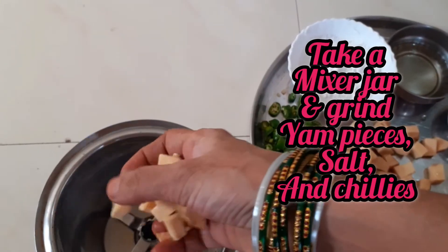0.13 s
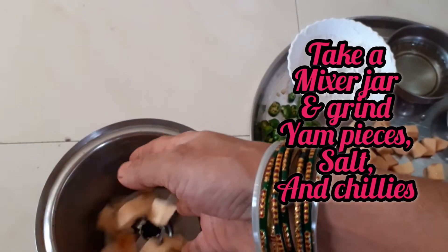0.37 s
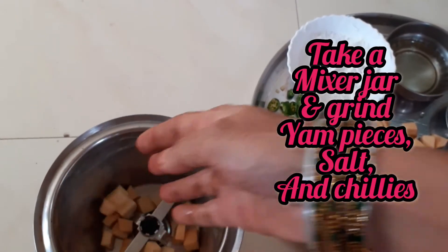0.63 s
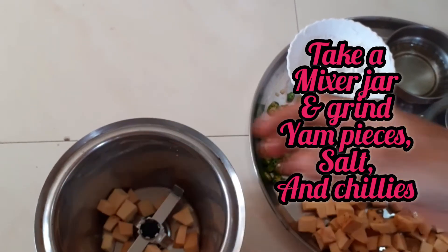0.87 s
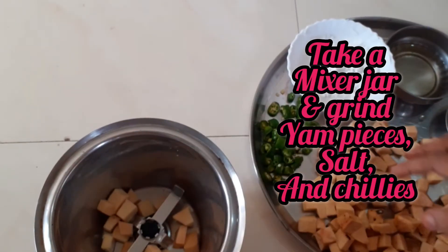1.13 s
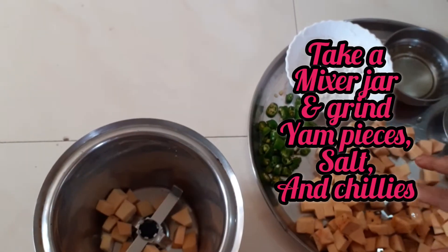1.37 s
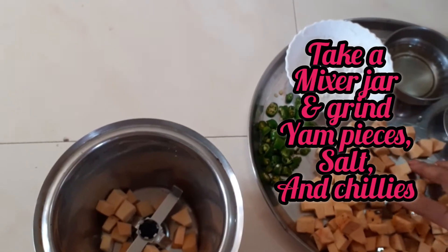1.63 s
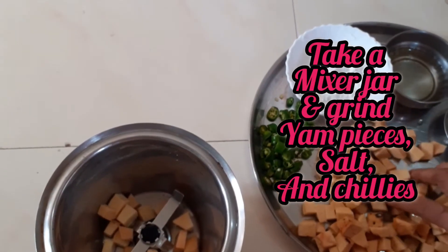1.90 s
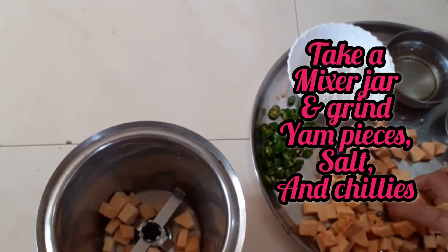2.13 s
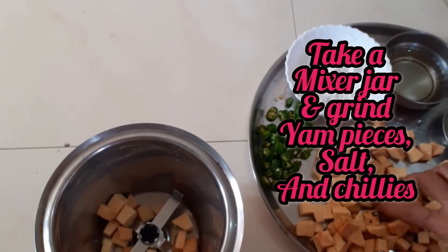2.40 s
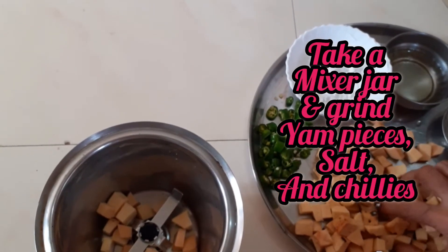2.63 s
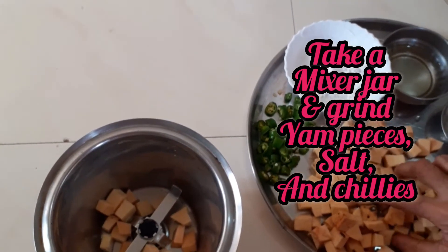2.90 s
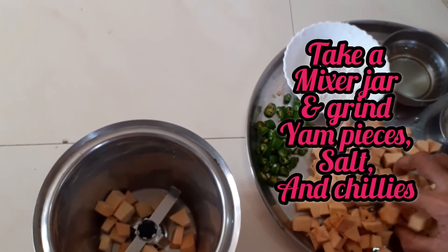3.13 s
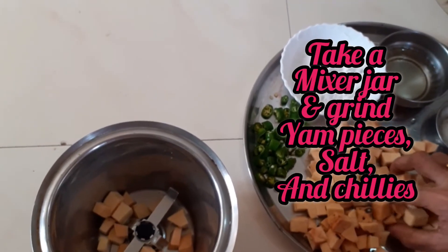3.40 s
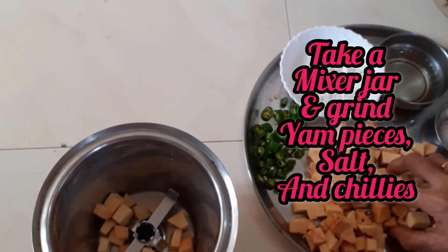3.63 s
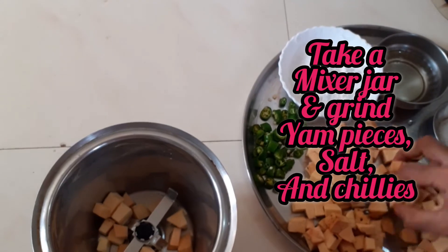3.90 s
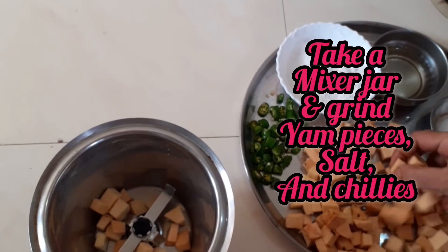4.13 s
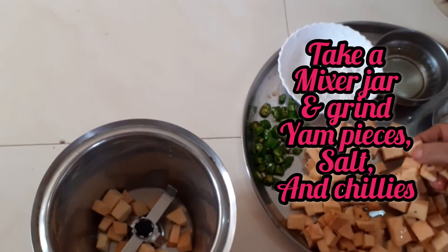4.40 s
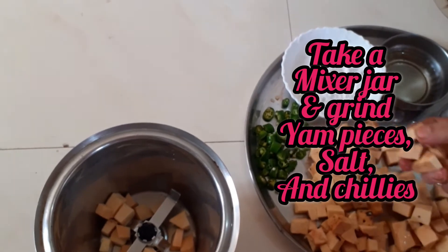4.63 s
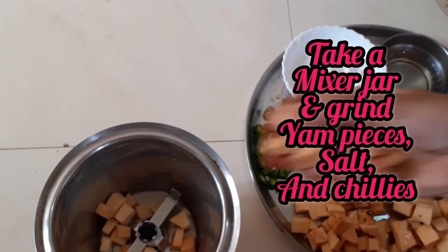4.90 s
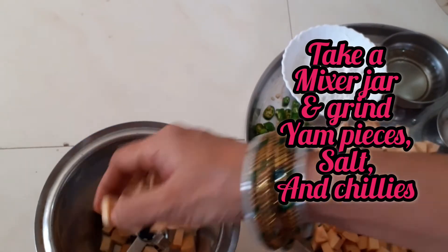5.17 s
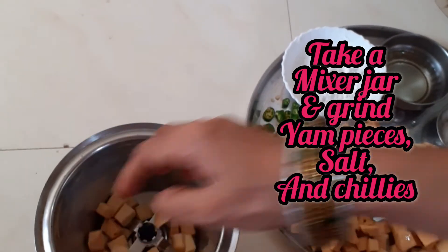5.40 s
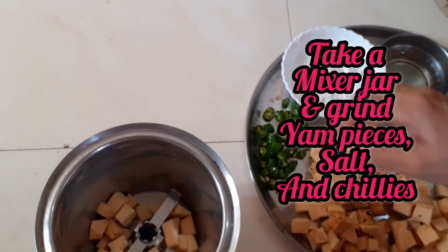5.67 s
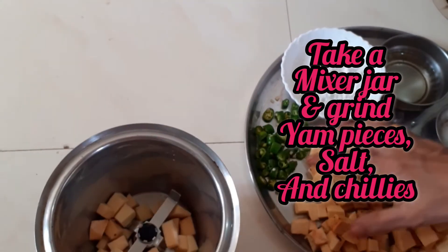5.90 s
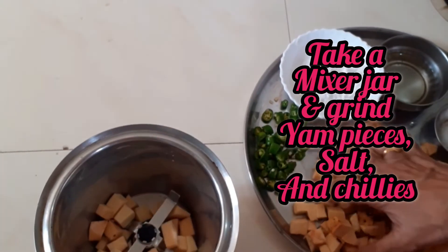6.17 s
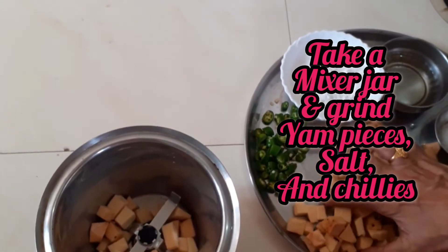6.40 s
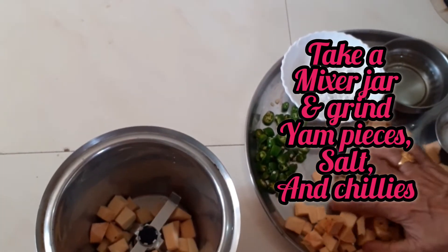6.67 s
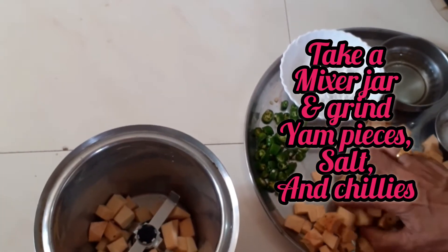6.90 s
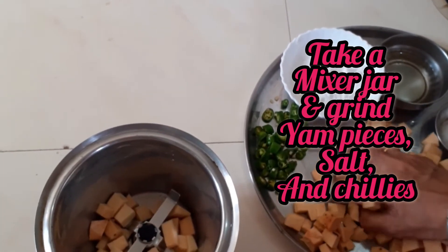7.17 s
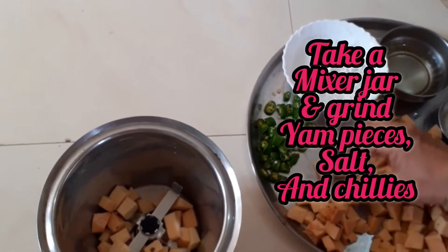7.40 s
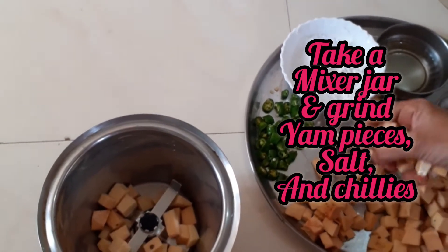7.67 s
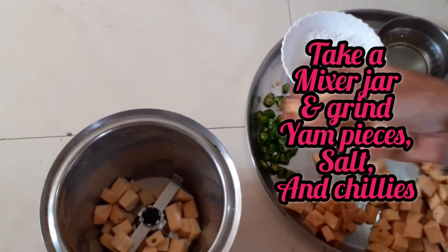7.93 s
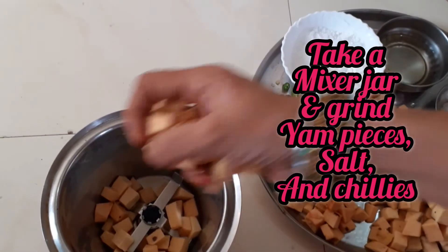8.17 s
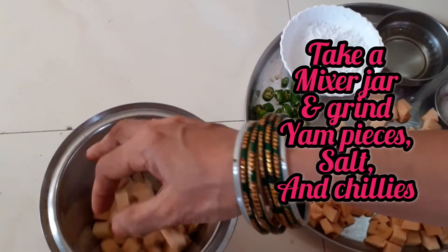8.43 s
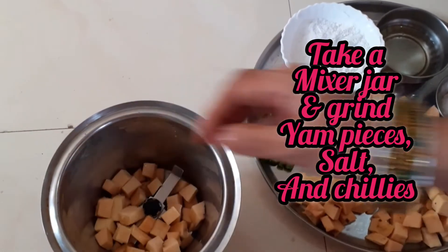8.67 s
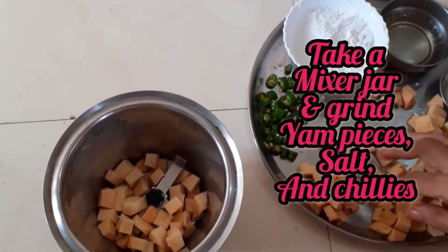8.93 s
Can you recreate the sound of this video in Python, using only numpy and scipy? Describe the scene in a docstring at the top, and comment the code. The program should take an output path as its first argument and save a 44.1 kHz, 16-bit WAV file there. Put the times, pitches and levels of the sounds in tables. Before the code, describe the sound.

Three handfuls of raw vegetable cubes clatter into a hollow steel jar, with ringing metal, soft finger rustling on a plate and bangles clinking between.

```python
"""A small hard kitchen, close stereo microphone: three handfuls of raw yam cubes drop into a steel jar.
The jar's air booms, its steel rings and a blade pings: decaying sines; cracks and knocks are filtered noise.
Between handfuls fingers gather wet cubes from a steel plate: noise scrapes, snaps and dull damped knocks.
Glass bangles clink in brief high modes with a noise scratch. The room answers with sparse decaying
echoes, and a low hum of shaped noise with motor tones lies under everything."""
import sys
import numpy as np
from scipy import signal
from scipy.io import wavfile
from scipy.ndimage import uniform_filter1d

SR = 44100
rng = np.random.default_rng(int(sys.argv[2]) if len(sys.argv) > 2 else 0)


def to_wav(sig):
    """Store sig (one row per channel, or 1-D mono) as 16-bit WAV at the path in sys.argv[1].

    Samples outside -1..1 are clipped; the rate is SR.
    """
    pcm = np.clip(np.atleast_2d(sig), -1, 1) * 32767
    pcm = np.round(pcm).astype(np.int16)
    wavfile.write(sys.argv[1], SR, pcm.T)  # frames by channels


def boost(x):
    """Linear amplitude factor 10**(x/20) for a level x in decibels (scalar or array-like)."""
    u = np.asarray(x, float) / 20
    return 10 ** u


N = 399105  # length in samples

# All levels below are relative, before the balance set in the functions.
# Spectrum of the room hum. Each row: frequency in Hz, density in dB per Hz.
HUM_SPECTRUM = [(15, -53), (25, -26.5), (102, -4.5), (195, -9), (270, -12), (309, -6.5), (607, -21),
                (659, -23), (1610, -33), (2110, -32), (16000, -41)]
# Left-right likeness of the hum. Each row: frequency in Hz, likeness from 0 to 1.
HUM_LIKENESS = [(60, 1), (300, 0.83), (1000, 0.12), (8000, 0.14)]
# Fuzzy motor tones in the hum. Each row: frequency in Hz, lift over the hum in dB.
MOTOR_TONES = [(100, 4), (152, -0.5), (203, 6), (305, 2.5), (405, 1.5)]
# Echo decay of the kitchen. Each row: frequency in Hz, t60 in seconds.
ROOM_DECAY = [(300, 0.74), (1000, 0.4), (3000, 0.52), (8000, 0.44), (15000, 0.4)]
# Fingers scraping among the cubes. Each row: start in seconds, length in seconds, level in dB.
SCRAPE_STROKES = [(1.536, 0.9, -75), (2.204, 0.37, -76.5), (2.599, 0.11, -67.5), (2.899, 0.21, -67),
                  (3.376, 0.32, -71), (3.752, 0.12, -74), (5.971, 0.045, -70.5), (6.123, 0.174, -74),
                  (6.377, 0.31, -68), (6.77, 0.07, -61), (7.044, 0.098, -62.5), (7.262, 0.038, -66.5)]
# Cubes tumbling dully over each other. Each row: start in seconds, level in dB, pitch in Hz.
CUBE_TUMBLES = [(2.091, -50.5, 393), (2.212, -53.5, 900), (2.303, -55, 2000), (2.315, -59, 2000),
                (2.316, -50, 440), (3.386, -52.5, 714), (3.872, -54.5, 770), (3.886, -58, 1020),
                (3.899, -49.5, 620), (3.949, -48, 1206), (3.961, -49, 1130), (3.988, -52, 880),
                (4.036, -45, 696), (4.129, -49, 697), (4.147, -45, 647), (4.165, -49.5, 1222),
                (4.177, -56, 895), (4.202, -51.5, 1107), (6.484, -52.5, 1266), (6.867, -51, 622),
                (7.1, -49, 486), (7.168, -52.5, 444), (7.233, -57, 622)]
# Wet cubes parting and tapping on the plate.
# Each row: time in seconds, treble level in dB, mid level in dB over the treble.
PLATE_TICKS = [(1.728, -57.5, -25), (1.875, -52, -14.5), (2.1565, -28.5, -7.5), (2.607, -47.5, -7.5),
               (2.6393, -41, -21.5), (2.658, -36.5, -16), (3.019, -47.5, -33), (3.26, -60, -4.5),
               (3.5684, -48, -23), (3.779, -48.5, -25), (3.9421, -42, -13), (4.0361, -31.5, -6),
               (4.2106, -42, -9.5), (5.156, -45.5, -10), (5.9382, -47.5, -15), (5.9831, -41.5, -17),
               (6.0141, -31.5, -12.5), (6.0319, -29.5, -46), (6.3, -49.5, -8), (6.41, -50.5, -11),
               (6.4832, -47, -4), (6.549, -30.5, -11.5), (6.8455, -41, -27), (7.022, -49.5, -28),
               (7.093, -36.5, -29), (7.2871, -48, -20), (7.396, -51.5, -21.5)]
# Bangles touching. Each row: start in seconds, level in dB.
BANGLE_CLINKS = [(1.2725, -53.5), (4.5191, -48), (4.5456, -37.5), (4.5824, -49.5), (4.6344, -36),
                 (4.6404, -40), (4.6564, -40.5), (4.6713, -35.5), (4.7032, -42), (4.7586, -29),
                 (4.7654, -36.5), (5.407, -36.5), (5.5004, -43), (5.5533, -44.5), (5.6017, -47),
                 (5.7977, -49), (7.5994, -45.5), (7.7797, -52.5), (8.1983, -42), (8.2107, -40),
                 (8.921, -53), (8.934, -45.5), (8.9491, -33), (9.023, -53.5)]
# Modes of the glass hoops. Each row: frequency in Hz, level in dB, t60 in seconds.
GLASS_MODES = [(5020, -11, .05), (5600, -13, .04), (8800, -5, .04), (9400, -2, .045), (9900, -3, .03),
               (10800, -1, .03), (12300, -3, .02), (14150, -5, .03), (14800, -2, .03)]
# Cubes striking the blade. Each row: start in seconds, level in dB.
BLADE_HITS = [(0.267, -58), (0.3598, -41), (0.396, -38), (5.312, -47.5), (8.379, -49.5), (8.428, -44.5),
              (8.511, -54.5)]
# Modes of the blade. Each row: frequency in Hz, level in dB, t60 in seconds.
BLADE_MODES = [(4840, 0, .1), (7390, -6, .25), (7540, -2, .12)]
# Main modes of the jar's steel.
# Each row: frequency in Hz, level in dB, t60 in seconds, lead of the left channel in radians.
STEEL_MODES = [(1107, 4, .52, 3.1), (1582, -21, 2.4, 1.5), (1700, -16, .7, 1.5), (1826, -21, 1.5, 1.5),
               (1910, -19, 1.4, 1.5), (2213, -17, 1.4, .9), (2334, -6, 1.1, .9), (2386, -1, .45, .9)]
# Dense high modes of the steel. Each row: frequency in Hz, level in dB, t60 in seconds.
STEEL_HIGH_MODES = [(3015, -11, .9), (3472, -5, 1.1), (3668, -4, 1.0), (4054, -5, .9), (4204, -2, .75),
                    (4576, -4.5, 1.1), (5040, -4, .7), (5103, -4, .7), (5259, -6, .8), (5324, -4, .75),
                    (5561, -6, .8), (5728, -2, .75), (6029, -3, .65), (6185, -4, .8), (6748, -4, .75),
                    (6926, -3, .55), (7079, -4, .3), (7951, -7, .45), (8522, -5, .48), (8845, -8, .44)]
# Cubes lying in the jar damp the steel, and each handful lands elsewhere.
# Each row: time of the handful in seconds, extra decay added to 1 / t60 in 1/s,
# then the levels in dB of the base mode, low wall modes, rim modes and high modes.
JAR_FILL = [(0.399, 0.022, -4, -5, -3, -21.5), (5.401, 0.078, 8, 7.5, 5.5, -21),
            (8.499, 1.3, 12, -4, 3, -14)]
# Cubes landing in the jar.
# Each row: start in seconds, thud level in dB, blow on the steel wall in dB over the thud.
CUBE_DROPS = [(0.243, -26.5, -50.5), (0.27, -40, -16), (0.307, -29, -33.5), (0.315, -24, -46.5),
              (0.322, -21.5, -44), (0.349, -20, -32.5), (0.36, -23.5, -1.5), (0.369, -22.5, -32.5),
              (0.378, -21.5, -16), (0.385, -31, -6.5), (0.397, -25.5, 6.5), (0.406, -29, -1.5),
              (0.416, -28.5, -32.5), (0.424, -27.5, -15.5), (0.452, -26.5, -14), (0.505, -40.5, 0.5),
              (0.593, -38, -27), (0.725, -48, -39.5), (5.269, -41.5, -34), (5.28, -33.5, -24.5),
              (5.288, -26, -18.5), (5.314, -27.5, -13.5), (5.322, -27, -23.5), (5.33, -31.5, 4.5),
              (5.344, -29.5, -10), (5.364, -47.5, -39), (5.384, -39, -2.5), (5.409, -39.5, -6),
              (5.498, -35.5, -59.5), (8.333, -34, -26.5), (8.349, -35, -31.5), (8.362, -34.5, -21.5),
              (8.372, -31, -10.5), (8.38, -26.5, -24), (8.408, -29.5, -19.5), (8.416, -30, -19),
              (8.424, -26, -13), (8.432, -20.5, -26), (8.448, -38.5, 5), (8.456, -32, -15.5),
              (8.464, -29.5, -24), (8.479, -42, -21), (8.513, -42, -2), (8.61, -50, -6)]


def evened(x):
    """Scales to rms 1."""
    return x / np.sqrt(np.mean(x ** 2) + 1e-20)


def read(points, hz):
    """Reads a table on a log-frequency axis."""
    f, value = np.transpose(points)
    return np.interp(np.log(hz + 1), np.log(f + 1), value)


def add(mix, s, sound):
    """Mixes a sound in at s seconds."""
    part = mix[..., round(s * SR):][..., :sound.shape[-1]]
    part += sound[..., :part.shape[-1]]


def band(x, lo_hz, hi_hz):
    """Causal band-pass."""
    return signal.sosfilt(signal.butter(2, [lo_hz, hi_hz], "band", fs=SR, output="sos"), x)


def swell(size, rise_s, power=1):
    """Envelope of a blow: rises to 1 at rise_s, then dies; a higher power narrows the peak."""
    u = np.arange(size) / SR / rise_s
    return (u * np.exp(1 - u)) ** power


def placed(x, pan_db, lag):
    """Stereo position: left louder by pan_db, and late by lag samples."""
    return np.array([np.roll(x, lag) * boost(pan_db / 2), x * boost(-pan_db / 2)])


def hum():
    """Low room rumble with wavering motor tones over faint hiss, in slowly drifting patches."""
    frames, hz = N // 1024 + 5, np.fft.rfftfreq(4096, 1 / SR)
    a, b, c, d, patches = rng.standard_normal((frames, 2049, 5)).T
    patches = evened(uniform_filter1d(uniform_filter1d(patches, 12, 0), 6, 1))
    tones_db = sum(db * np.exp(-((hz - f) / 9) ** 2) for f, db in MOTOR_TONES)
    likeness = read(HUM_LIKENESS, hz)[:, None]
    left = a + 1j * b
    right = likeness * left + np.sqrt(1 - likeness ** 2) * (c + 1j * d)
    spectrum_db = (read(HUM_SPECTRUM, hz) + tones_db)[:, None] + 2.4 * patches
    z = np.array([left, right]) * boost(spectrum_db)
    rumble = signal.istft(z, nperseg=4096, noverlap=3072)[1][:, :N]
    return boost([[-63.0], [-59.2]]) * evened(rumble)


def kitchen(x):
    """Sparse echoes of random sign, each band dying at its own speed; three tails take turns."""
    taps = np.zeros((6, SR // 2 + SR // 4))  # three stereo tails
    at = np.arange(300, taps.shape[1] - 20, 20)  # one echo in every 20 samples
    at = at + rng.integers(0, 20, (6, len(at)))
    np.put_along_axis(taps, at, rng.choice([-1., 1.], at.shape), 1)
    hz, t, z = signal.stft(taps, SR, nperseg=256)
    decay_db = -60 * t / read(ROOM_DECAY, hz)[:, None]
    tails = signal.istft(z * boost(decay_db), SR, nperseg=256)[1]
    tails = tails / np.linalg.norm(tails[0])
    turn = 2 * np.pi * 7 * np.arange(N) / SR  # 7 rounds a second
    turn = turn + 2 * np.pi / 3 * np.arange(3)[:, None]
    fed = np.repeat(x * np.sqrt((1 + np.cos(turn)) / 3), 2, 0)
    wet = signal.fftconvolve(fed, tails, axes=1)[:, :N].reshape(3, 2, N).sum(0)
    return (wet + 0.039 * wet[::-1]) * boost([[-1.8], [1.8]])


def rustle():
    """Wet scraping: each stroke sprays tiny crackles that come in clumps, then fades."""
    rise_s, fade_db_per_s, crackles_per_s = .03, 116.5, 1200
    t, strokes = np.arange(N) / SR, np.zeros(N)
    for s, length, db in SCRAPE_STROKES:
        fade_db = fade_db_per_s * np.maximum(t - s - length, 0)
        strokes += np.clip((t - s) / rise_s, 0, 1) * boost(db - fade_db)
    clumps_db = 4.5 * evened(uniform_filter1d(rng.standard_normal(N), 500))
    size = boost(3.5 * np.minimum(rng.exponential(1, N), 5))
    crackles = size * (rng.random(N) < crackles_per_s / SR) * rng.standard_normal(N)
    wet = evened(band(crackles, 3200, 18000) + 0.49 * band(crackles, 1700, 3500))
    return strokes * boost(clumps_db) * wet


def tumbles():
    """Dull dry knocks of flesh on flesh: a few damped cycles in a wide puff of noise."""
    out, t = np.zeros(N), np.arange(2000) / SR
    noises = rng.standard_normal((len(CUBE_TUMBLES), 2000))
    for (s, db, hz), noise in zip(CUBE_TUMBLES, noises):
        knock = 1.2 * np.sin(2 * np.pi * hz * t) + 3 * band(noise, .7 * hz, 1.6 * hz)
        add(out, s, boost(db) * swell(size=2000, rise_s=.0018) * knock)
    return out


def ticks():
    """Snaps of noise with their own share of treble and mid; the room is fed one sample of equal energy."""
    treble, mid = np.zeros((2, 2, N))
    noises = rng.standard_normal((len(PLATE_TICKS), 2000))
    for (s, db, mid_db), noise in zip(PLATE_TICKS, noises):
        puff = swell(size=2000, rise_s=.002, power=2) * noise
        click = np.linalg.norm(puff) * (np.arange(2000) == 60)
        snap = np.array([puff, click])
        add(treble, s - .0012, boost(db - 6) * snap)
        add(mid, s - .0012, boost(db + mid_db + 6.5) * snap)
    return band(treble, 2900, 19000) + band(mid, 1100, 3300)


def bangles():
    """Thin glass hoops damped by the wrist: brief high modes (chime) and a noisy tick (scratch)."""
    (chime, scratch), t = np.zeros((2, N)), np.arange(3000) / SR
    hz, db, t60 = np.transpose(GLASS_MODES)[:, :, None]
    draws = rng.standard_normal((len(BANGLE_CLINKS), 2, len(GLASS_MODES), 1))
    for (s, level_db), (hoop, spot) in zip(BANGLE_CLINKS, draws):
        mode_hz = hz * (1 + .018 * hoop)
        modes = boost(db + 5 * spot - 60 * t / t60) * np.sin(2 * np.pi * mode_hz * t)
        add(chime, s, boost(level_db - 10.5) * modes.sum(0) * np.minimum(t / 0.00031, 1))
        tick = swell(size=3000, rise_s=0.0026) * rng.standard_normal(3000)
        add(scratch, s, boost(level_db - 11.0) * tick)
    # the scratch takes the colour of the glass
    hoops = (boost(db / 3 - 60 * t / 0.002) * np.sin(2 * np.pi * hz * t)).sum(0)
    scratch = signal.oaconvolve(scratch, hoops / np.linalg.norm(hoops))[:N]
    return chime, band(band(scratch, 4400, 19000), 4600, 18000)


def pings():
    """The thick blade answers a direct hit with a few short bright tones."""
    out, t = np.zeros(N), np.arange(8000) / SR
    hz, db, t60 = np.transpose(BLADE_MODES)[:, :, None]
    spots = rng.standard_normal((len(BLADE_HITS), len(BLADE_MODES), 1))
    for (s, level_db), spot in zip(BLADE_HITS, spots):
        tones = boost(level_db + db + 2 * spot - 60 * t / t60) * np.sin(2 * np.pi * hz * t)
        add(out, s, tones.sum(0) * np.minimum(t / .0012, 1))
    return out


def steel_modes():
    """All modes of the jar in one table; the high ones reach the two channels with chance phases."""
    lead = 2 * rng.random(len(STEEL_HIGH_MODES))
    return np.vstack([STEEL_MODES, np.c_[STEEL_HIGH_MODES, lead]])


def rings():
    """The blows set the steel ringing: base, wall and rim modes, and the dense high modes."""
    out, t = np.zeros((2, N)), np.arange(int(1.5 * SR)) / SR
    lead_in_s = .3  # room for blows before the time of the handful
    hz, db, t60, lead = steel_modes().T[:, :, None]
    group = np.digitize(hz[:, 0], [1300, 2000, 3000])  # base, wall, rim, high
    damping = np.where(group[:, None] < 3, 1, 1.4)  # lying cubes damp the high modes more
    drops = np.array(CUBE_DROPS)
    spot_db = 2.5 * rng.standard_normal((len(drops), len(hz)))  # where a cube lands favours some modes
    for start, fill, *pour_db in JAR_FILL:
        pour = abs(drops[:, 0] - start) < 1
        s, thud_db, wall_db = drops[pour].T
        blows = np.zeros((len(hz), SR))
        at = ((s - start + lead_in_s) * SR).astype(int)
        blows[:, at] = boost(thud_db + wall_db + spot_db[pour].T)
        share_db = np.array(pour_db)[group, None]
        decay_db = 60 * t * (1 / t60 + fill * damping)
        modes = boost(db + share_db - decay_db) * np.exp(2j * np.pi * hz * t)
        modes = modes * np.minimum(t / 0.0018, 1)
        rung = signal.fftconvolve(blows, modes, axes=1)
        left = (rung * np.exp(1j * lead)).imag.sum(0)
        add(out, start - lead_in_s, np.array([left, rung.imag.sum(0)]))
    return boost([[-14.0], [-11.0]]) * out


def thuds():
    """Each soft cube pushes the air in the jar, which booms briefly; the base knocks and the steel cracks."""
    air_hz, air_spread = 788.3, 0.045  # the air's pitch, drawn at random around one value for each thud
    (air, knocks, cracks), t = np.zeros((3, N)), np.arange(4000) / SR
    noises = rng.standard_normal((len(CUBE_DROPS), 4000))
    for (s, db, wall_db), noise in zip(CUBE_DROPS, noises):
        hz = air_hz * (1 + air_spread * noise[0])
        boom = swell(size=4000, rise_s=.0048, power=3) * np.sin(2 * np.pi * hz * t)
        add(air, s, boost(db + 1.5) * boom)
        add(knocks, s, boost(db - 4.5) * swell(size=4000, rise_s=0.0035, power=1.72) * noise)
        crack_db = db - 7 + 0.41 * wall_db  # follows the blow on the wall in part
        add(cracks, s + .003, boost(crack_db) * swell(size=4000, rise_s=.002, power=1.3) * noise)
    crack = band(band(cracks, 3800, 19000), 3600, 18000)
    knock = band(knocks, 300, 660) + .7 * band(band(knocks, 1100, 2600), 720, 2800)
    return air, crack + knock


def scene():
    """Jar boom to the left; cracks, blade, plate and wrist to the right, all close up in one room."""
    (air, cracks), ring, blade = thuds(), rings(), pings()
    (taps, clicks), knocks, scrape, (chime, scratch) = ticks(), tumbles(), rustle(), bangles()
    near = placed(air, 3.8, lag=1) + placed(cracks + blade, -8.5, lag=9) + ring
    near += placed(taps + knocks + scrape, -2.1, lag=0) + placed(chime + scratch, -5.5, lag=4)
    # what each source sends to the walls
    sent = boost(-3.0) * air + boost(-1.5) * cracks + boost(-6.5) * blade + boost(-5.0) * ring[1]
    sent += boost(-1.5) * (scratch + 0.48 * chime)
    sent += boost(2.0) * clicks + boost(1) * knocks + boost(1.5) * scrape
    return near + kitchen(sent) + hum()


def low_pass(x):
    """Removes everything above the highest recorded frequency."""
    return signal.sosfilt(signal.butter(12, 15950, fs=SR, output="sos"), x)


def record(dry):
    """A noise suppressor turns down, by up to 4.5 dB, whatever sinks near the steady background."""
    z = signal.stft(dry, nperseg=512, noverlap=384)[2]
    power = (abs(z) ** 2).mean(0)
    power = uniform_filter1d(uniform_filter1d(power, size=16, axis=0), size=9, axis=1)
    steady = np.percentile(power, 15, axis=1, keepdims=True)
    keep = np.clip(1 - 3.3 * steady / (abs(power) + 1e-20), boost(-4.5), 1)
    keep = uniform_filter1d(keep, size=5, axis=1)
    mix = signal.istft(z * keep, nperseg=512, noverlap=384)[1][:, :N]
    return low_pass(mix)


dry = scene()
out = record(dry)
to_wav(out)
```